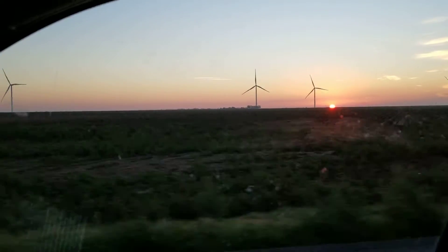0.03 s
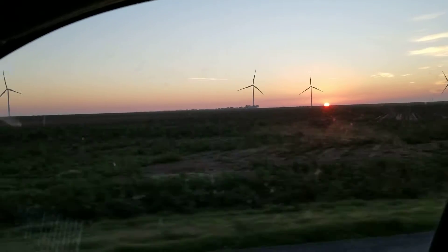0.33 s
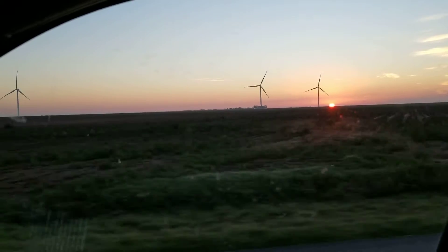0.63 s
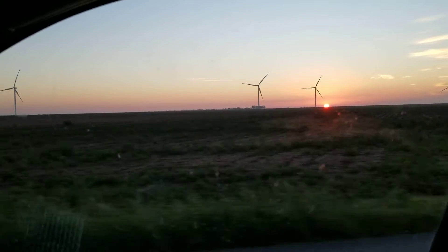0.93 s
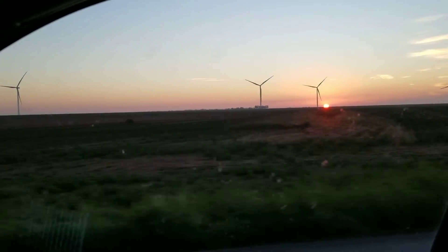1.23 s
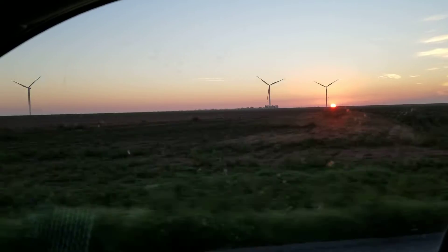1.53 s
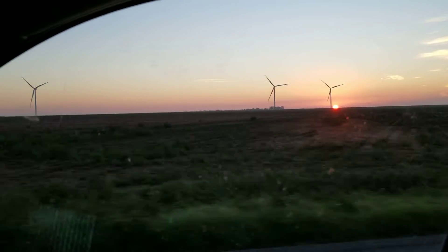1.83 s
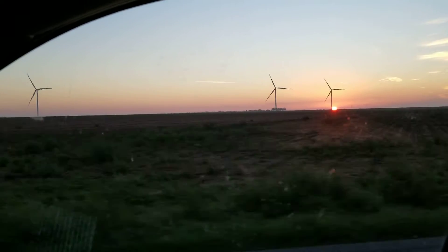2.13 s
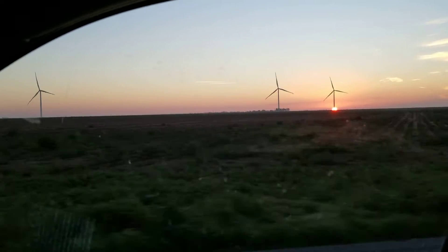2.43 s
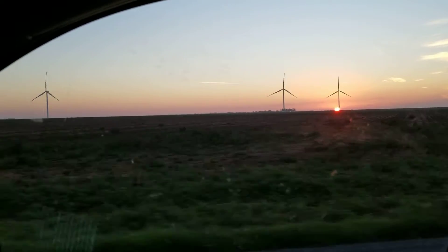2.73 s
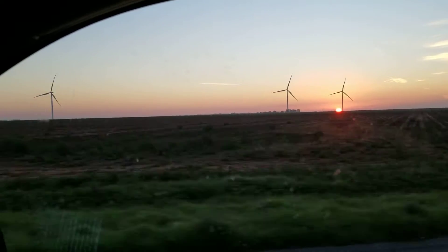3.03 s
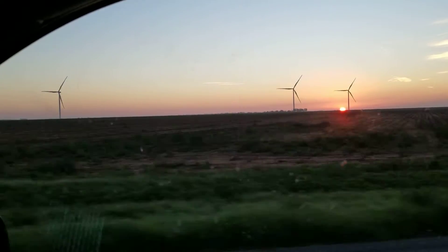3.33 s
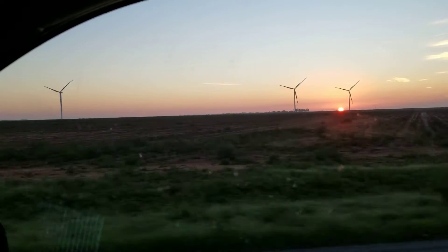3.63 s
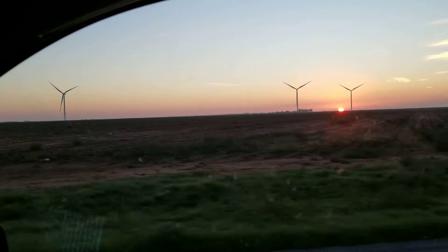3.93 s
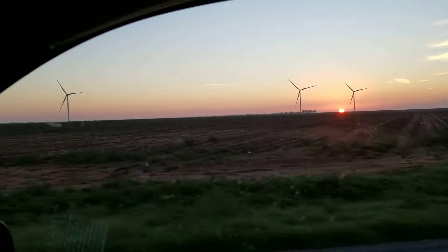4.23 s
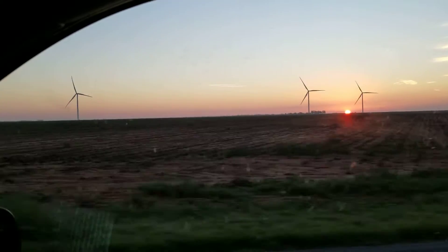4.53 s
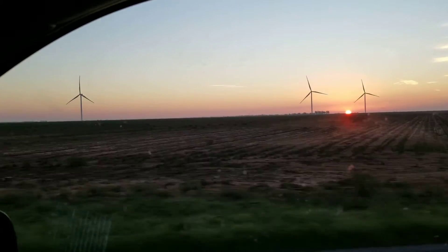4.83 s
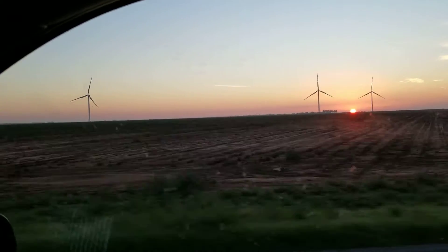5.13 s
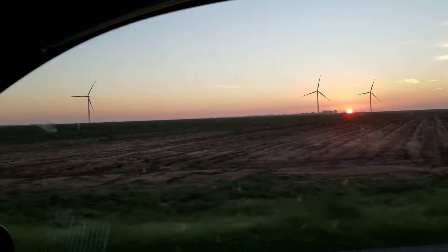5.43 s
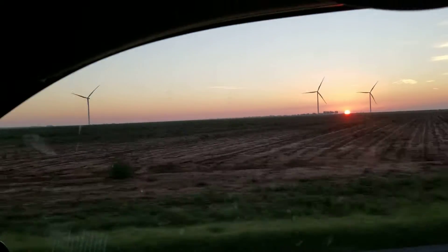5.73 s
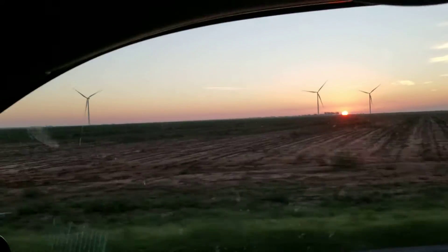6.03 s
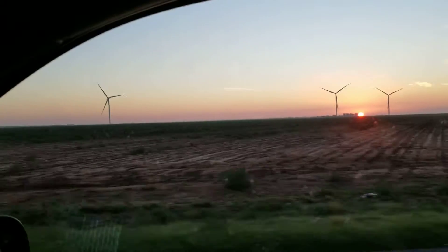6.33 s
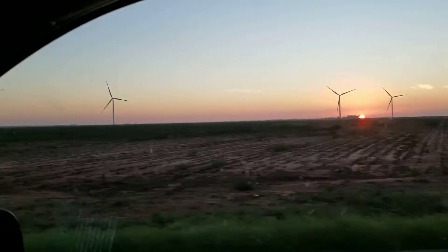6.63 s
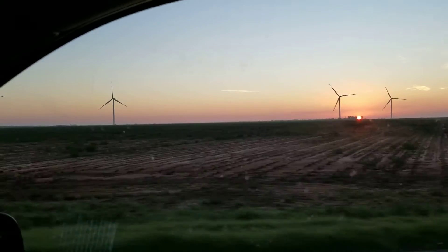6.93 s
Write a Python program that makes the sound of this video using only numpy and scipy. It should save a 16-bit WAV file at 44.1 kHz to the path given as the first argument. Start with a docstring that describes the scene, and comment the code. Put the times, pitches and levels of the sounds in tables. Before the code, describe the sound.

Inside a moving car with the windows shut, a deep road rumble carries on with tyre noise, a rough hum and light wind.

```python
"""Inside a car cruising at a nearly steady speed on a country road, windows shut, one close on the right.
The uneven road shakes the body and makes the cabin air boom. Tyres roar through the doors,
the running gear (the wheels and what drives them) hums, and wind hisses along the glass.
Something light rustles faintly, once near 3 seconds and again near 4."""
import sys
import numpy as np
from scipy import signal
from scipy.fft import rfft, irfft
from scipy.io import wavfile
from scipy.ndimage import uniform_filter1d

SR = 44100
rng = np.random.default_rng(int(sys.argv[2]) if len(sys.argv) > 2 else 0)


def digitize_waveform(pressure):
    """Quantize a signal to 16-bit integers and store it at the path in sys.argv[1].

    Rows of a 2-D input are taken as channels; values are limited to [-1, 1].
    """
    field = np.atleast_2d(pressure).T
    bounded = np.clip(field, -1, 1)
    quanta = np.round(bounded * 32767).astype(np.int16)
    wavfile.write(sys.argv[1], SR, quanta)


N = 312669
TIME, FREQ = np.arange(N) / SR, np.fft.rfftfreq(N, 1 / SR)


def undb(db):
    """Turn decibels (dB) into a gain, a number to multiply a sound by."""
    return 10 ** (np.asarray(db) / 20)


def unit(x):
    """Scale a signal to an average power of 1."""
    return x / np.sqrt(np.mean(x ** 2))


def swing(db):
    """Shift a changing level in dB so that its average power sits at 0 dB."""
    return db - 10 * np.log10(np.mean(undb(db) ** 2))


def swell(at_s, width_s):
    """A smooth rise to 1 and fall; width_s away from the top it is down to about 0.6."""
    return np.exp(-.5 * ((TIME - at_s) / width_s) ** 2)


def colour(points, rings=()):
    """A gain for each frequency: a line through the points, lifted where something rings."""
    hz, db = np.transpose(points)
    gain = undb(np.interp(np.log(np.maximum(FREQ, 1)), np.log(hz), db))
    gain = gain / np.maximum(FREQ / hz[-1], 1) ** 6  # steep fall above the last point
    for centre, width, lift in rings:
        peak = 1 / (1 + (2 * (FREQ - centre) / width) ** 2) ** 2
        gain = gain * np.sqrt(1 + (undb(lift) ** 2 - 1) * peak)
    return gain


def noise(gain):
    """Random noise with the given strength at each frequency."""
    return irfft(rfft(rng.standard_normal(N)) * gain, N) * np.sqrt(SR / 2)


def wander(rate_hz):
    """A smooth random wobble of size about 1 that turns roughly rate_hz times a second."""
    return unit(noise(np.exp(-(FREQ / rate_hz) ** 2)))


def pan(db):
    """Left and right gains; a negative db puts the sound to the right."""
    return undb(np.array([[db], [-db]]) / 2)


def all_around(gain):
    """Noise from all round the cabin: unrelated on the two sides, weaker on the shielded left."""
    # The sound shadow on the left. Each row: frequency in Hz, left minus right in dB.
    shadow = [(100, -5), (200, -12.5), (450, -8), (830, -5), (920, -9), (1200, -13), (1360, -9),
              (1900, -15.5), (2500, -11), (3500, -15.5), (5200, -24), (7600, -11), (9300, -1), (12000, -15)]
    return np.array([noise(gain * colour(shadow)), noise(gain)])


def road_roughness(bump_width_s=.05, ripple_db=1.04):
    """How hard the road shakes the car, in dB: long uneven stretches, single bumps and small ripples."""
    # The unevenness of the road. Each row: time in seconds, relative level in dB.
    stretches = [(0.0, -21.5), (0.35, -17), (1.1, -23), (1.6, -18.7), (2.0, -20.8), (2.7, -19.9),
                 (3.8, -18.5), (4.8, -20.5), (5.45, -19), (6.15, -21), (7.09, -19.5)]
    # Bumps that briefly swell the boom. Each row: time in seconds, added roughness in dB.
    bumps = [(1.52, 3.5), (2.89, 4), (3.09, 3), (3.70, 3.5), (5.33, 5), (5.58, 4), (6.06, 5), (6.36, 3),
             (6.82, 2.7)]
    uneven = np.interp(TIME, *np.transpose(stretches))
    jolts = sum(db * swell(at_s, bump_width_s) for at_s, db in bumps)
    return swing(uneven + jolts + ripple_db * wander(9))


def body_rumble(follow=0.96, evenness=0.8, lag_radians=0.25, deep_lift_db=2.5, deep_hz=65):
    """The road shakes the body and rings the cabin air; such long waves reach both sides almost alike."""
    # The shaking of the floor and panels. Each row: frequency in Hz, level in dB.
    panels = [(10, -70.5), (20, -56), (32, -51.5), (44, -48), (65, -45), (100, -44), (128, -45), (160, -44),
              (210, -50.5), (255, -50.5), (300, -55), (400, -60.5), (520, -67.5), (750, -96)]
    # The notes at which the cabin air booms. Each row: frequency in Hz, width in Hz, lift in dB.
    cabin_rings = [(81.3, 12.3, 5.5), (103.3, 18, 6.5), (599.6, 69.5, 18)]
    shake = noise(colour(panels, cabin_rings))
    boom_band = 1 / (1 + (FREQ / 135) ** 8) - 1 / (1 + (FREQ / 60) ** 8)  # 60 to 135 Hz
    boom = irfft(rfft(shake) * boom_band, N)
    # Even out most of the boom's chance swells, so that the road sets its strength.
    strength = np.sqrt(uniform_filter1d(unit(boom) ** 2, size=SR // 7))
    road_boom = boom * undb(follow * road_roughness()) / strength ** evenness
    right = shake - boom + road_boom
    # The left side lags a little and gets more of the deepest shudder.
    left_gain = undb(deep_lift_db / (1 + (FREQ / deep_hz) ** 4)) * np.exp(-1j * lag_radians)
    return np.array([irfft(rfft(right) * left_gain, N), right])


def tyre_roar(patch_db=3, grain_db=0.38, fade_db_per_s=0.1):
    """The tread flutters on grainy asphalt, swells on one coarse patch and eases as the car slows."""
    # Tyre roar coming through the doors. Each row: frequency in Hz, level in dB.
    roar = [(30, -78.5), (110, -53), (200, -53.5), (260, -53.5), (320, -59.5), (420, -55.5), (510, -66),
            (660, -63.5), (900, -63), (1300, -70), (1700, -76), (2400, -82), (4000, -104)]
    # The ringing of tread and door panels. Each row: frequency in Hz, width in Hz, lift in dB.
    rings = [(639, 54, 4.5), (989, 60, 6), (1184, 62, 5), (1948, 170, 8)]
    coarse_patch = patch_db * swell(at_s=0.97, width_s=0.027)
    level_db = coarse_patch + grain_db * wander(7) - fade_db_per_s * TIME
    return all_around(colour(roar, rings)) * undb(swing(level_db))


def wind_hiss(swirl_db=0.57, fade_db_per_s=0.09):
    """Air hisses over the glass, stirred by small swirls and easing as the car slows."""
    # Wind at the window and its seals. Each row: frequency in Hz, level in dB.
    hiss = [(500, -73.5), (1500, -75), (2600, -80), (3900, -79.5), (4400, -83), (5000, -84), (5600, -89),
            (6300, -102.5), (7800, -113), (9000, -108), (10500, -102), (12200, -99.5), (14000, -108),
            (15700, -121)]
    level_db = swirl_db * wander(20) - fade_db_per_s * TIME
    return all_around(colour(hiss)) * undb(swing(level_db))


def running_gear_hum(start_hz=276.6, slowing_per_s=.0016, waver_hz=2.18, level_db=-34,
                     throb_hz=3.25, throb_peak_s=0.17, throb_db=2, rough_db=2.5):
    """Turning parts make a rough, throbbing tone that sinks with the speed, and weaker drones above it."""
    # Narrow drones of the wheels and drive.
    # Each row: frequency in Hz, width in Hz, level in dB before panning, left minus right in dB.
    drones = [(392.3, 9.8, -47.5, -4), (446.5, 13, -45, -5)]
    pitch_hz = start_hz * (1 - slowing_per_s * TIME) + waver_hz * wander(10.5)
    tone = np.sin(2 * np.pi * np.cumsum(pitch_hz) / SR)
    throb = throb_db * np.cos(2 * np.pi * throb_hz * (TIME - throb_peak_s))
    rough_tone = unit(tone * undb(throb + rough_db * wander(14)))
    hum = rough_tone * undb(level_db) * pan(-5.5)
    for centre, width, db, side_db in drones:
        band = 1 / (1 + (2 * (FREQ - centre) / width) ** 2)
        hum = hum + unit(noise(band)) * undb(db) * pan(side_db)
    return hum


def rustles(grain_db=2):
    """Something light brushes nearby on the right, in brief, grainy touches."""
    # The touches. Each row: time in seconds, peak level in dB before panning, width in seconds.
    touches = [(2.848, -64, .004), (3.972, -63, .003), (3.993, -58.5, .003), (4.003, -62.5, .009)]
    # Their thin, high sound. Each row: frequency in Hz, relative level in dB.
    brush = [(4000, -16), (7200, -11), (9000, 0), (12000, -4), (15500, -14)]
    loudness = sum(undb(db) * swell(at_s, width_s) for at_s, db, width_s in touches)
    grit = np.array([unit(noise(colour(brush)) * undb(grain_db * wander(150))) for _ in range(2)])
    return grit * loudness * pan(-6)


def scene():
    """Everything heard from the passenger seat, left and right."""
    return body_rumble() + tyre_roar() + wind_hiss() + running_gear_hum() + rustles()


def record(dry, hiss_db=-117, top_hz=15700):
    """The microphones add their own faint hiss, and the highest treble is cut away."""
    hiss = np.array([noise(undb(hiss_db)) for _ in range(2)])
    treble_cut = signal.ellip(10, .1, 80, top_hz, fs=SR, output="sos")
    return signal.sosfilt(treble_cut, dry + hiss)


dry = scene()
out = record(dry)
digitize_waveform(out)
```